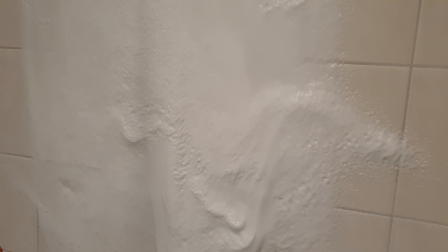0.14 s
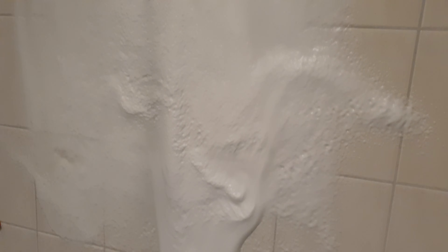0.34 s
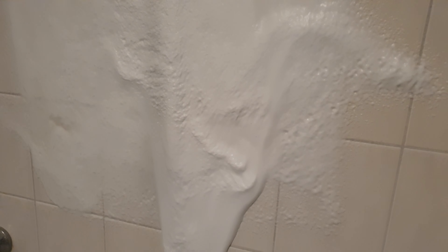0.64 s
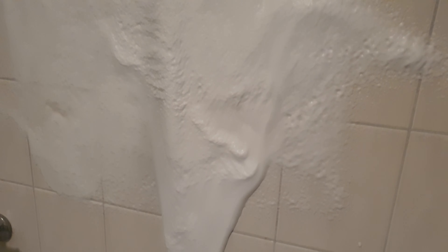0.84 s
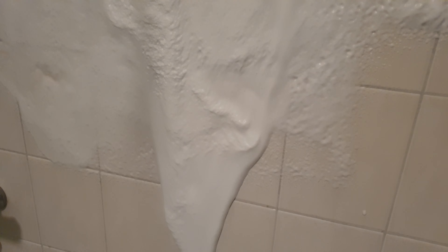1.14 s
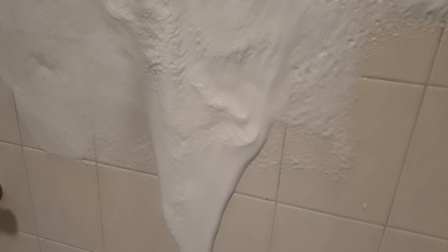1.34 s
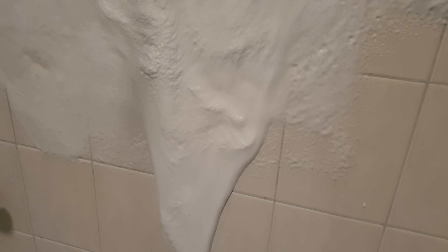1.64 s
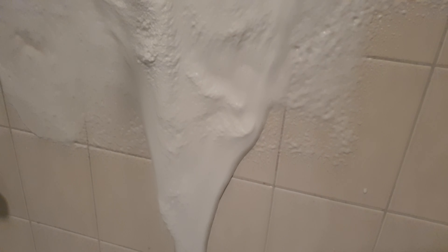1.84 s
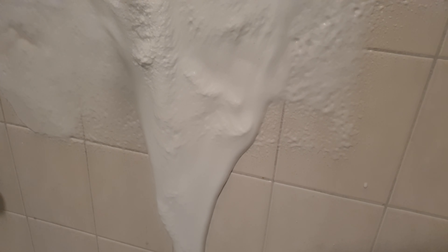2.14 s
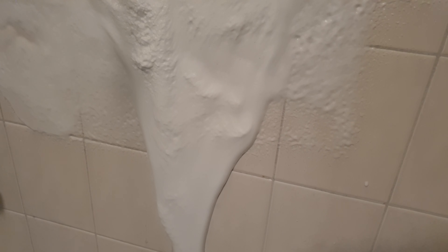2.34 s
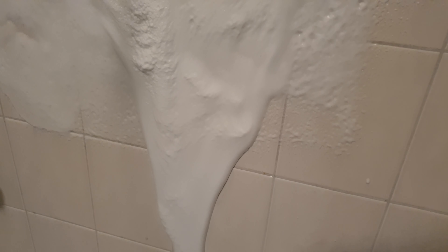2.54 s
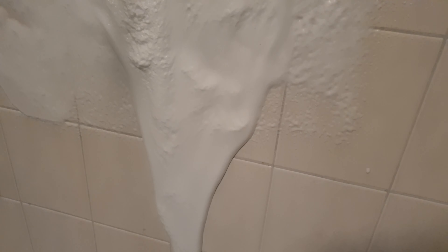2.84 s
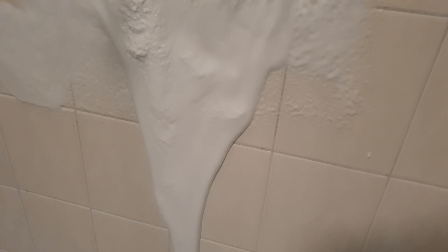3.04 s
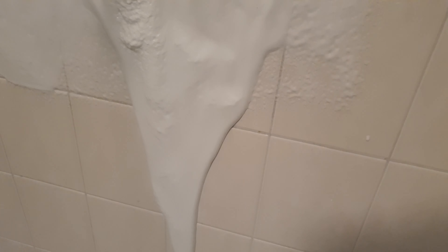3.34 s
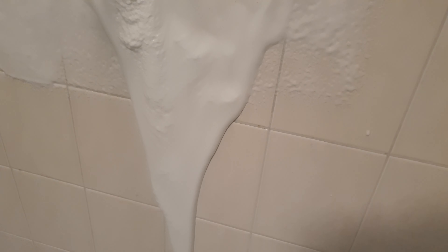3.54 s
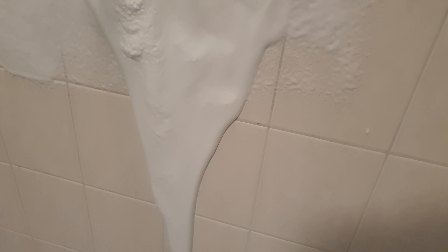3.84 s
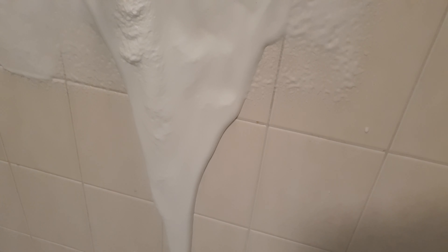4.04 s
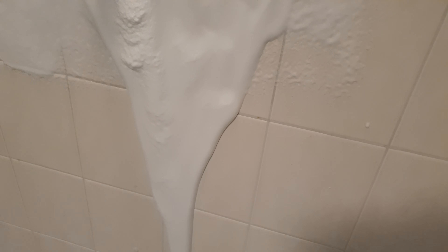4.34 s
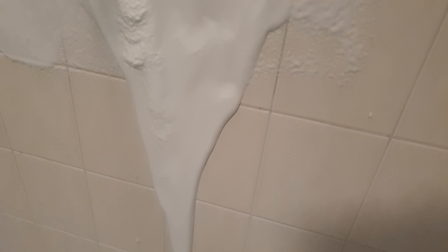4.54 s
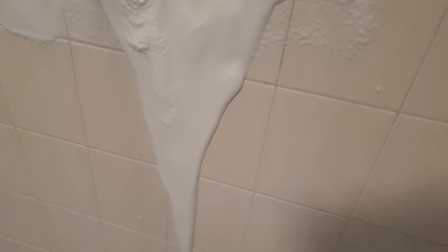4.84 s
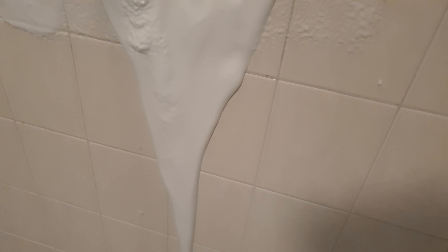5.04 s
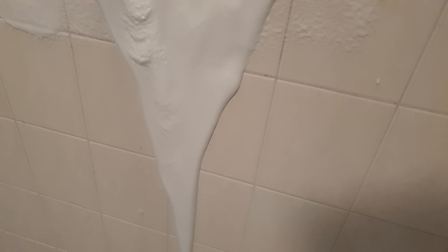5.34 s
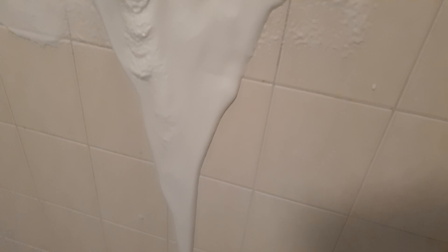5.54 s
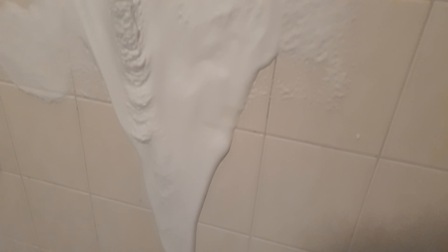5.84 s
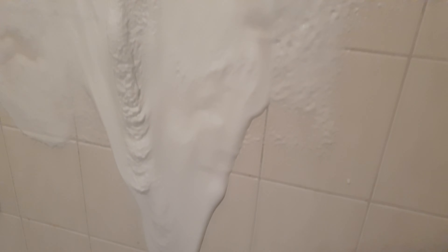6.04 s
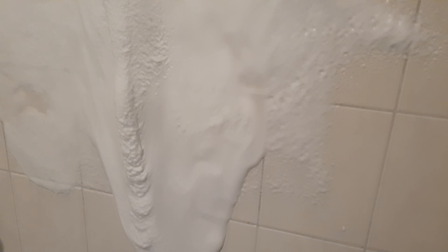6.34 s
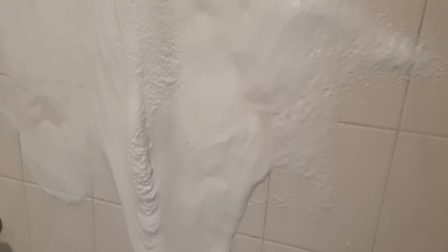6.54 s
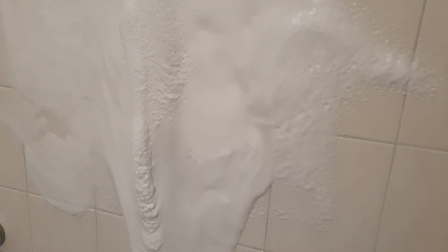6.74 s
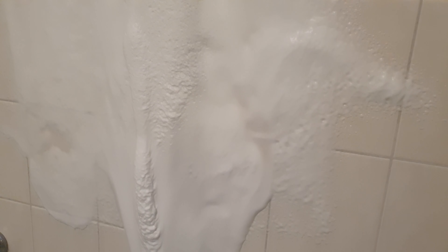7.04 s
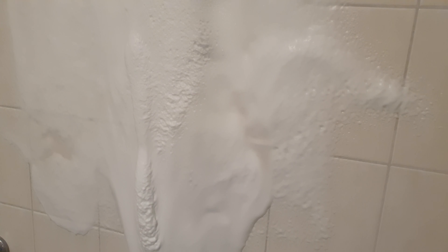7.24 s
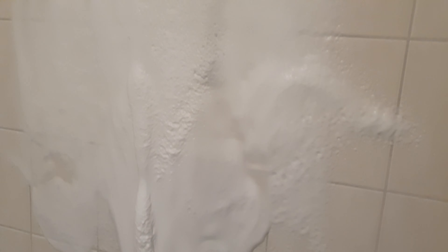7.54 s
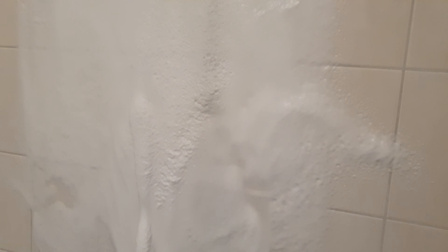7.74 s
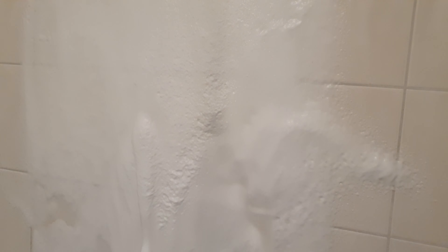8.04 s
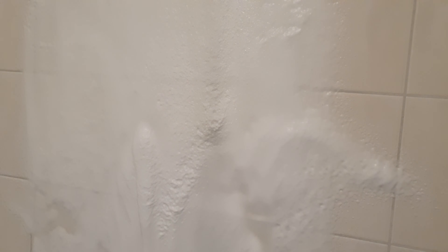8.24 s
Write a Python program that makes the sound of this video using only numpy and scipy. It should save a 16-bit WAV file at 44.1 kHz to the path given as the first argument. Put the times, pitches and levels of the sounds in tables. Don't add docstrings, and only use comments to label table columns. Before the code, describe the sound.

A steady, bright hiss of a hand-pump foam sprayer drumming hollowly into thick foam on a tiled wall in a small echoing room.

```python
import sys
import numpy as np
from scipy import signal
from scipy.fft import rfft, irfft, next_fast_len
from scipy.io import wavfile
from scipy.ndimage import uniform_filter1d, map_coordinates

SR = 44100
rng = np.random.default_rng(int(sys.argv[2]) if len(sys.argv) > 2 else 0)


def unload_audio(sound):
    columns = np.transpose(np.atleast_2d(sound))
    steps = np.round(np.clip(columns, -1, 1) * 32767)
    wavfile.write(sys.argv[1], SR, steps.astype(np.int16))


def invert_db(level):
    return 10 ** (np.asarray(level, dtype=float) / 20)


N = 370435


def unit(x):
    return x / np.sqrt(np.mean(np.abs(x) ** 2) + 1e-20)


def along(points, hz):
    point_hz, value = np.transpose(points)
    return np.interp(np.log(hz + 1), np.log(point_hz + 1), value)


def curves(rows, t):
    s, *columns = np.transpose(rows)
    return [np.interp(t, s, column) for column in columns]


def wobble(rate_hz):
    return map_coordinates(rng.standard_normal(1000), [np.arange(N) * rate_hz / SR])


def bell(t, centre_s, length_s):
    return np.exp(-(2 * (t - centre_s) / length_s) ** 2)


def filtered(x, response):
    m = next_fast_len(N + SR // 2)
    return irfft(rfft(x, m) * response(np.fft.rfftfreq(m, 1 / SR)), m)[..., :N]


def moving(x, response):
    frames = dict(nperseg=1024, noverlap=768)
    hz, t, z = signal.stft(x, SR, **frames)
    return signal.istft(z * response(hz[:, None], t), SR, **frames)[1][..., :N]


def peak(hz, centre_hz, width_hz):
    return 1j * hz * width_hz / (centre_hz ** 2 - hz ** 2 + 1j * hz * width_hz)


# time_s, lowest_hz, level_db
CRATER_PITCH = [(0, 830, -40), (.5, 700, -35.5), (1.1, 655, -34), (1.6, 607, -29), (2.3, 622, -34),
                (3.1, 570, -31), (4.4, 548, -35.5), (5.1, 550, -30), (5.72, 617, -35), (6.08, 894, -35.5),
                (6.5, 870, -35.5), (7.1, 853, -40.5), (8.2, 788, -33.5), (8.4, 776, -32.5)]


def shade(hz, t):
    depth, width_hz = 0.31, 484
    low_hz = curves(CRATER_PITCH, t)[0]
    return 1 - depth * np.abs(peak(hz, 2.02 * low_hz, width_hz)) ** 2


# time_s, echo_delay_ms, port_lag_change_ms
WALL_DRIFT = [(0, 1.7, .02), (.5, 1.616, 0), (1.1, 1.498, 0), (1.7, 1.397, 0), (2.3, 1.326, .005),
              (2.7, 1.305, 0), (3.3, 1.248, 0), (3.8, 1.233, 0), (5.2, 1.239, -.005), (5.6, 1.269, -.005),
              (5.9, 1.355, -.01), (6.5, 1.5, -.012), (7.4, 1.722, -.05), (7.75, 1.786, -.045),
              (8, 1.797, -.04), (8.4, 1.79, -.03)]
# freq_hz, lead_rad
PORT_LEAD = [(0, 0), (690, .4), (1400, 2.4), (2670, 5.9), (6630, 11.3), (8790, 15.4), (9730, 17.5),
             (10900, 22.3), (13300, 26), (15000, 31), (16700, 33.5)]


def paths(hz, t):
    wall_ms, lag_ms = curves(WALL_DRIFT, t)
    further_ms = wall_ms - 1.24
    echo_db = -1 - 6.5 * further_ms
    direct_db = 0.22 + 0.5 * further_ms

    def late(ms):
        return np.exp(-2j * np.pi * hz * ms / 1000)

    behind = np.exp(-1j * np.interp(hz, *np.transpose(PORT_LEAD)))
    left = 1 + invert_db(echo_db - 3) * late(wall_ms - .095)
    right = behind * (late(lag_ms) + invert_db(echo_db - 1.5) * late(wall_ms - .345))
    beam = invert_db(-8 / (1 + (hz / 9500) ** 6))
    rest_db, turn_db = .6, 3.6
    lean_db = rest_db / 2 + turn_db / 2 * bell(t, centre_s=2.2, length_s=2.6)
    return beam * invert_db(direct_db) * np.array([left * invert_db(lean_db), right * invert_db(-lean_db)])


# freq_hz, t60_s
TILE_DECAY = [(300, 0.8), (2000, 0.68), (8000, 0.56), (15000, 0.27)]
# freq_hz, correlation
WASH_LIKENESS = [(200, 0.56), (500, 0.83), (800, 0), (1200, 0.033), (16000, 0)]


def room(x):
    hz, t, z = signal.stft(rng.standard_normal((35, 2, SR // 3)), SR, nperseg=256)
    t60_s = along(TILE_DECAY, hz)[:, None]
    z = z * invert_db(-60 * t / t60_s) / np.sqrt(t60_s)
    turn = np.arccos(np.clip(along(WASH_LIKENESS, hz), -1, 1))[:, None] / 2
    pair = np.cos(turn) * z[:, :1] + np.sin(turn) * z[:, 1:] * [[[1]], [[-1]]]
    tails = signal.istft(pair, SR, nperseg=256)[1]
    step = SR // 4
    fade = np.sin(np.pi * np.arange(2 * step) / (2 * step))
    out = np.zeros((2, N + 2 * SR))
    x = np.pad(x, (step, SR), mode="wrap")
    for k, tail in enumerate(tails):
        slab = x[k * step:][:2 * step] * fade
        piece = signal.fftconvolve(slab[None], tail / np.linalg.norm(tail[0]), axes=1)
        out[:, k * step:][:, :piece.shape[1]] += piece
    return out[:, step - 130:][:, :N]


# centre_s, change_db, length_s
FLOW_SPURTS = [(.07, 3, .07), (.54, 1, .08), (.85, 1.5, 0.17), (1.52, -1.5, 0.22), (1.93, 2, 0.093),
               (2.1, 2, 0.057), (2.3, 1, .3), (3.19, 3, .06), (3.6, 1, .15), (3.78, 2, .07),
               (4.14, -1.5, .12), (4.43, 3, .12), (4.67, 2, .08), (4.86, 1.5, .07), (5.04, -2.5, 0.16),
               (5.23, 2, .08), (5.43, 3, .1), (5.56, 4, 0.063), (5.8, 0, 0.13), (6.1, 1.5, 0.13),
               (6.48, 1.5, 0.53), (8.12, 1.5, .15)]
# freq_hz, level_db_per_hz
LEFT_COLOUR = [(250, -27), (1450, -10.5), (2100, -9), (3500, -6.5), (5000, -6), (6600, -2), (7500, -17.5),
               (8500, -5.5), (10000, -3.5), (11200, 0.5), (12300, 1), (14000, 8), (15800, -1.5)]
RIGHT_COLOUR = [(250, -28.5), (1450, -11), (2100, -8), (3300, -6.5), (5500, -6), (7000, -2), (8000, -5.5),
                (8800, 2), (10500, 0), (11200, 6), (12500, 6), (14000, 3.5), (15800, 9)]


def nozzle():
    t = np.arange(N) / SR
    spurt_db = sum(db * bell(t, s, length_s) for s, db, length_s in FLOW_SPURTS)
    flow_db = -26.5 + spurt_db
    sputter_db = 1.7 * wobble(60) + 1.3 * wobble(110)
    sputter_db = sputter_db - uniform_filter1d(sputter_db, size=SR // 14)
    fizz = invert_db(flow_db + sputter_db) * rng.standard_normal(N)
    fizz = filtered(fizz, lambda hz: np.abs(peak(hz, 10900, 16500)))
    body = invert_db(-17.5 + 0.53 * spurt_db + 0.35 * sputter_db) * rng.standard_normal(N)
    body = moving(body, lambda hz, t: shade(hz, t) / (1 + (hz / 5000) ** 2))
    jet = fizz + body
    heard = invert_db(-3.5) * moving(jet, paths) + invert_db(-4.5) * room(jet)
    return invert_db(4.5) * filtered(heard, lambda hz: invert_db([along(LEFT_COLOUR, hz), along(RIGHT_COLOUR, hz)]))


# start_s, length_s, first_hz, last_hz, peak_db
CRATER_OVERTONES = [
    (-.5, 0.81, 1210, 1160, -39.5),
    (.1, 2.5, 2240, 1850, -44),
    (1.2, 2.4, 1750, 1500, -41),
    (2.3, 2.42, 1510, 1230, -40.5),
    (3.9, 1.77, 1180, 1120, -45),
    (2.2, 1.7, 2640, 2100, -49.5),
    (4.6, 1.43, 1480, 1740, -39.5),
    (5.897, 2.54, 1170, 1190, -45),
]
# centre_hz, width_hz, gain_db
ROOM_MODES = [(500.4, 32, 6.5), (568.5, 18, 5.5), (678, 25, 6), (870, 9.8, 0), (960, 35, 2.5),
              (1102, 94, 3)]


def crater(hz, t):
    low_hz, low_db = curves(CRATER_PITCH, t)
    spatter_db = -44 - 6.5 * np.log2(low_hz / 578)
    power = np.abs(invert_db(low_db + 18.5) * peak(hz, low_hz, 0.33 * low_hz) ** 2) ** 2
    power += np.abs(invert_db(spatter_db + 16) * shade(hz, t) * peak(hz, 840, 2550)) ** 2
    for s, length_s, first_hz, last_hz, db in CRATER_OVERTONES:
        u = np.clip((t - s) / length_s, 0, 1)
        swell = np.abs(np.sin(np.pi * u)) ** 0.41 * (u < 1)
        glide_hz = first_hz * (last_hz / first_hz) ** u
        power += np.abs(invert_db(db + 22.5) * swell * peak(hz, glide_hz, 294) ** 2) ** 2
    return np.sqrt(power)


def hollow():
    def favoured(hz):
        gain_db = sum(db * np.abs(peak(hz, c, w)) ** 2 for c, w, db in ROOM_MODES)
        return invert_db(gain_db) / (1 + (440 / (hz + 1)) ** 6)

    def port_phase(hz):
        return np.exp(1j * np.interp(hz, *np.transpose(PORT_LEAD)) * [[.5], [-.5]])

    roar = filtered(moving(rng.standard_normal(N), crater), favoured)
    return invert_db(-2.5) * filtered(roar, port_phase) + invert_db(-2) * room(roar)


# centre_hz, width_hz, level_db
HUM_LINES = [
    (101.4, 5.2, -64),
    (159.4, 7.6, -75.5),
    (198, 12, -71),
    (275.7, 12.6, -67),
]
# freq_hz, level_db_per_hz
STILL_AIR = [(25, -40), (48, 13), (100, -7.5), (160, -4.5), (300, 0), (500, 1), (900, -60)]


def building():
    def line(centre_hz, width_hz):
        return unit(filtered(rng.standard_normal(N), lambda hz: peak(hz, centre_hz, width_hz) ** 2))

    t = np.arange(N) / SR
    low_db = -60.5 + .8 * wobble(5) + 4 * bell(t, centre_s=4.4, length_s=1.6)
    hum = invert_db(low_db) * line(53, 12)
    hum = hum + sum(invert_db(db) * line(hz, width_hz) for hz, width_hz, db in HUM_LINES)
    air = rng.standard_normal(N) + 0.6 * rng.standard_normal((2, N))
    return hum + invert_db(-55.5) * unit(filtered(air, lambda hz: invert_db(along(STILL_AIR, hz))))


# start_s, peak_db, pitch_hz
FINGER_BUMPS = [(0.199, -41, 61.9), (0.311, -39, 81), (0.553, -38, 92), (0.962, -31, 74), (1.299, -51, 102),
                (1.699, -46, 72.7), (1.879, -33, 67), (5.182, -40, 78.1), (5.507, -39, 75.4),
                (5.699, -43, 67.3), (5.969, -39, 72.7), (6.436, -32, 67.3), (7.966, -33, 57),
                (8.239, -53, 88.8)]


def bumps():
    cycles = 2.2
    out = np.zeros(N + SR)
    for s, db, hz in FINGER_BUMPS:
        length = int(cycles * SR / hz)
        u = np.arange(length) / length
        flex = np.sin(np.pi * u) ** 2 * np.cos(2 * np.pi * cycles * (u - .4))
        out[round(s * SR):][:length] += invert_db(db + 4) * flex
    return out[:N] * invert_db([[-26], [0]])


# start_s, peak_db, pitch_factor
FAR_KNOCKS = [
    (2.41, -46, 1),
    (2.47, -47, 0.92),
    (6.272, -36.5, 1.04),
    (6.325, -40, 0.94),
    (6.37, -41, .96),
    (6.51, -50, 0.95),
]
# freq_hz, level_db, t60_s
PANEL_MODES = [(142, -5.5, 0.31), (206.8, 5, 0.31), (249, -1, 0.21), (307, 3, 0.15), (330, -1, 0.15)]


def knocks():
    t = np.arange(SR // 2) / SR
    onset = 1 - np.exp(-t / .014)
    out = np.zeros(N + SR)
    for s, db, pitch in FAR_KNOCKS:
        ring = 0
        for hz, level_db, t60_s in PANEL_MODES:
            tone = np.sin(2 * np.pi * (hz * pitch * t + rng.random()))
            ring = ring + invert_db(level_db - 60 * t / t60_s) * tone
        out[round(s * SR):][:len(t)] += invert_db(db) * ring * onset
    return out[:N] * invert_db([[.5], [-.5]])


def scene():
    return nozzle() + hollow() + building() + bumps() + knocks()


def top_cut(x):
    return signal.sosfilt(signal.butter(12, 16700, fs=SR, output="sos"), x)


def record(dry):
    def band(hz):
        return (hz < 15750) / (1 + (42 / (hz + 1)) ** 6)

    return top_cut(filtered(dry, band))


dry = scene()
out = record(dry)
unload_audio(out)
```